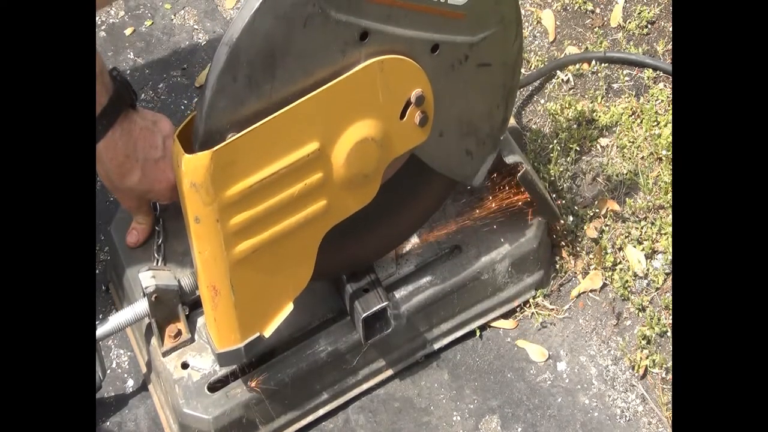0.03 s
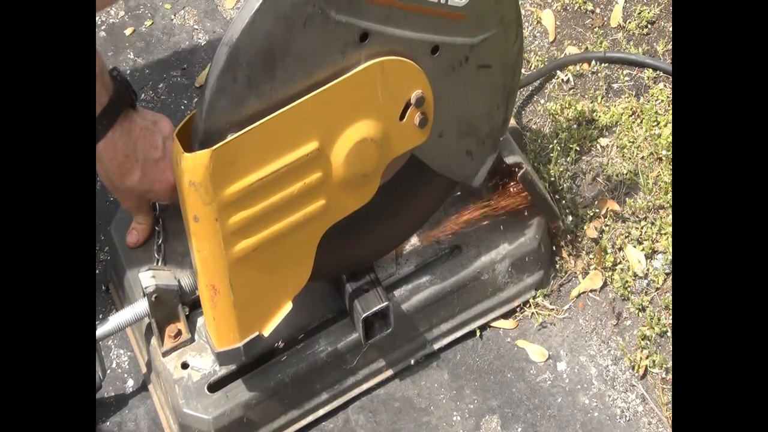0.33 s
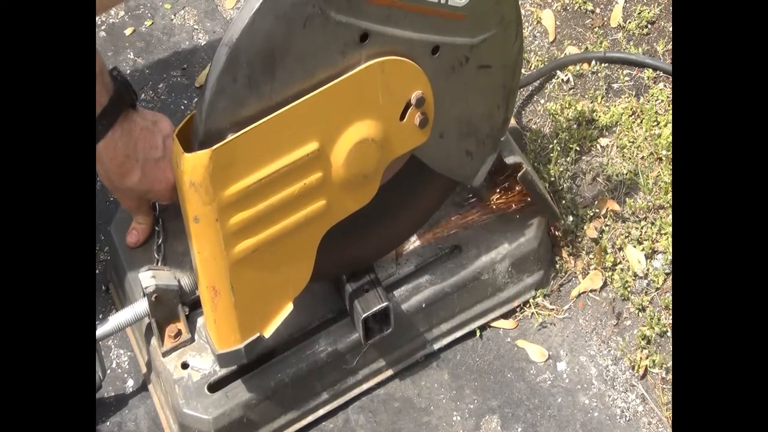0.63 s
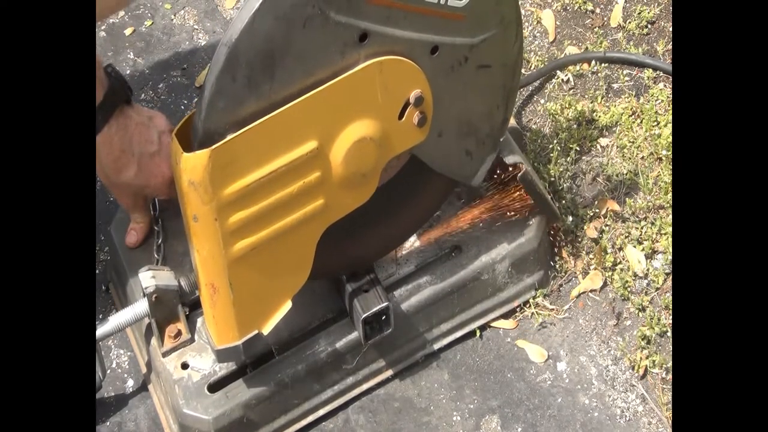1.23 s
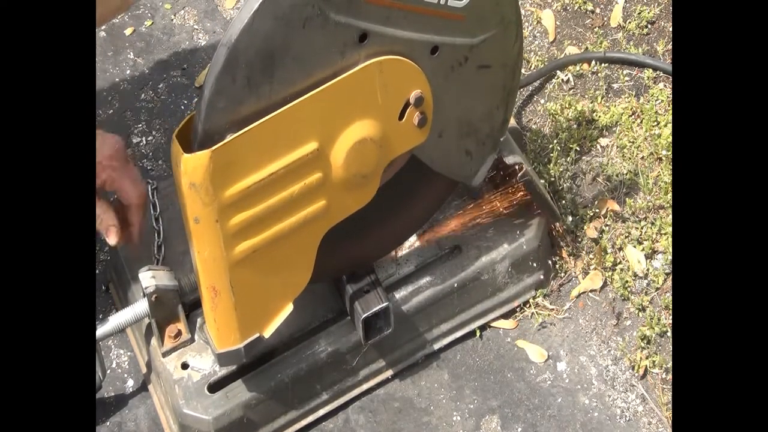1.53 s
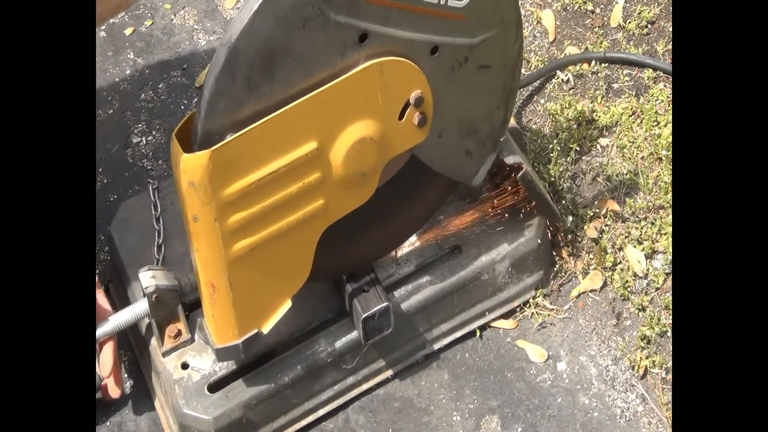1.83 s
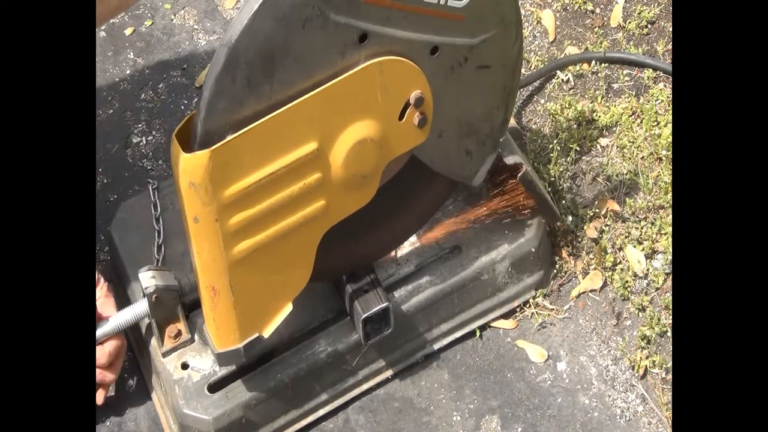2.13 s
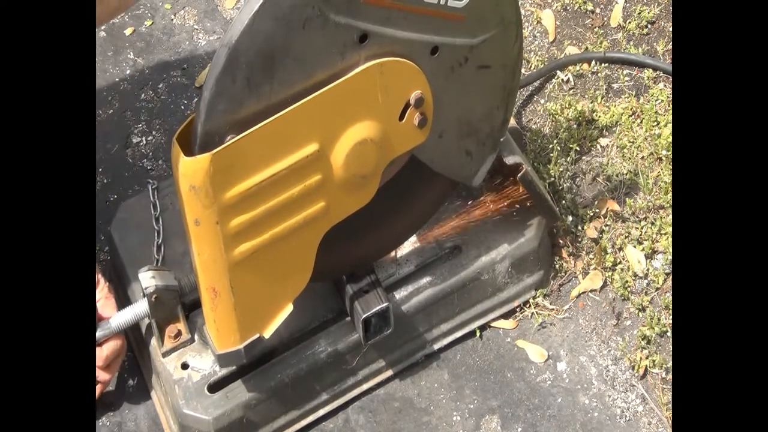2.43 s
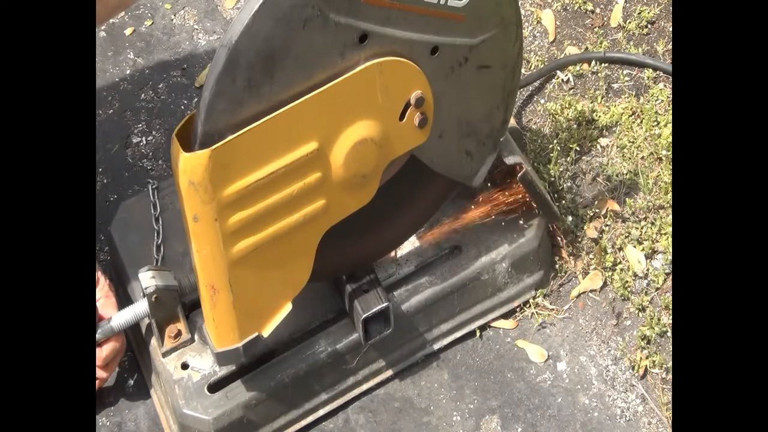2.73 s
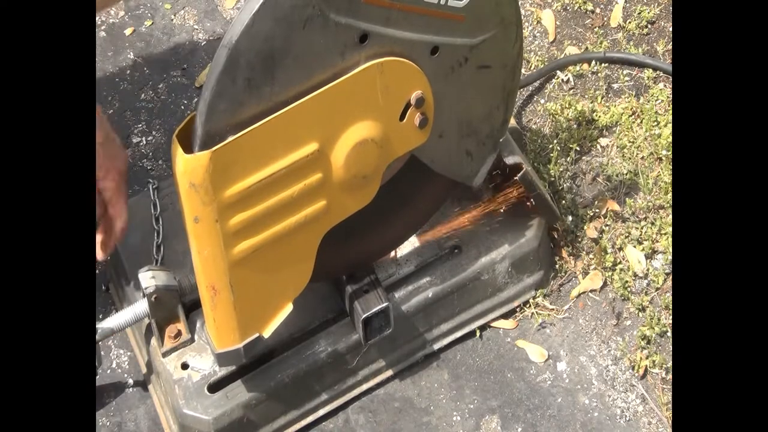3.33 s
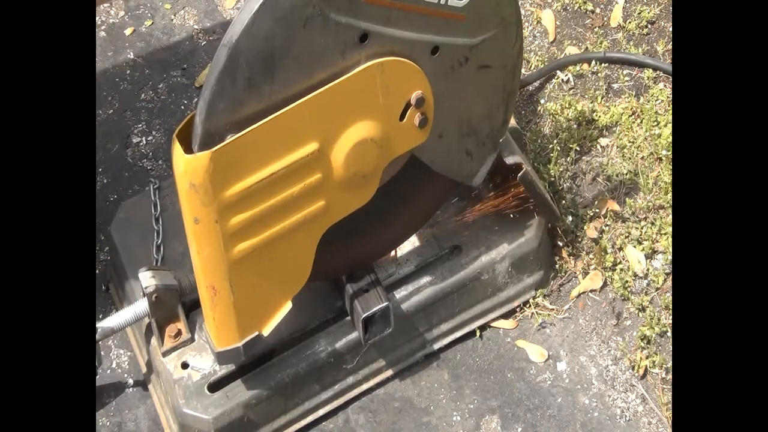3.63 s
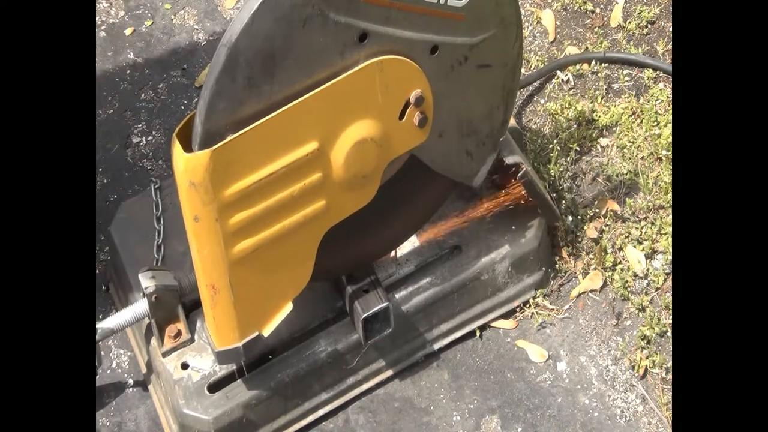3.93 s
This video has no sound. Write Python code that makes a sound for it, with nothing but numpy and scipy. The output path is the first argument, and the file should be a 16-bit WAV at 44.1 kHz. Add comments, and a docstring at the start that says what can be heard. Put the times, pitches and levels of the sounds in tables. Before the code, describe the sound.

An abrasive cutoff saw grinds through steel tubing close by outdoors, with a buzzing roar, bright hiss and thin metallic squeal. Its motor whine drops in pitch as the wheel bites, then rises near the end.

```python
"""Cutoff saw through steel tubing

An abrasive wheel grinds through a tube outdoors, slowing as it bites, then recovering. Nearly the
same grit passes the cut on every turn, so the roar and hiss buzz at the wheel's rate. The wheel's
orders slide through the fixed resonances of tube and guard, the tube's walls squeal, and the geared
motor whines on top. Moving air rumbles faintly underneath."""
import sys
import numpy as np
from scipy import signal
from scipy.fft import rfft, irfft, next_fast_len
from scipy.io import wavfile
from scipy.ndimage import map_coordinates

SR = 44100
rng = np.random.default_rng(int(sys.argv[2]) if len(sys.argv) > 2 else 0)


def store_wav(level_fs):
    """Save 16-bit WAV to argv[1]."""
    pcm = np.round(np.clip(np.atleast_2d(level_fs), -1, 1) * 32767)
    wavfile.write(sys.argv[1], SR, pcm.T.astype(np.int16))


N = 176400

# how steadily the wheel sits in the cut: t/s, steadiness/0-1
SEATING = [(0, .7), (1.1, .7), (1.5, .82), (2.7, .8), (3.4, .7), (3.58, .4), (4, .32)]


def grinding(turns, roar_lumps_db=2.0, hiss_lumps_db=1.0, pressure_db=0.47):
    """High spots on the rim press harder, pulsing the roar of the tube and the hiss of the cut."""
    # swells with feed pressure: t/s, roar level/dB, hiss level/dB
    feed = [(0, -20.3, -20), (.45, -20, -20.9), (.65, -18.6, -20.5), (.9, -19.4, -20), (1.2, -20, -19.8),
            (1.65, -22.6, -20.6), (1.9, -21.7, -20), (2.4, -21.5, -20), (2.8, -21.8, -20),
            (3.25, -21.8, -20), (3.52, -19.4, -20.4), (3.7, -20.5, -20.9), (4, -20.6, -21)]
    # tone colour of the roar: f/Hz, level/dB
    roar_colour = [(60, -56), (140, -20), (205, -16), (260, -3.5), (310, -7), (365, 1), (430, -3), (600, 0),
                   (670, -4.5), (780, 3.5), (900, -2.5), (1150, -4), (1420, 0.5), (1620, -4.5), (2000, -4),
                   (2500, -10), (4000, -16), (8000, -57)]
    # tone colour of the hiss: f/Hz, level/dB
    hiss_colour = [(1500, -45), (2900, -13), (3550, -6), (4120, -6), (4240, -1.5), (4450, -4), (4750, -2.5),
                   (4950, -8), (5300, -7), (5600, -1.5), (5900, -3), (6200, -1), (6500, -3), (6850, 0),
                   (7300, 1.8), (7650, .5), (7900, -3), (8450, -2), (8930, 1.5), (9100, -2), (9800, -2),
                   (11100, -2), (12000, -5.5), (13000, -10), (13800, -15), (14800, -11), (15800, -22)]
    roar_db, hiss_db = np.array(curves(feed)) + pressure_db * wobble(16)
    roar_grit = scrape(turns, repeats=0.38) * amp(roar_lumps_db * rim(turns, points=12))
    hiss_grit = scrape(turns, repeats=0.77) * amp(hiss_lumps_db * rim(turns, points=44))
    roar = spread(roar_grit, lambda hz: amp(along(roar_colour, hz)))
    hiss = spread(hiss_grit, lambda hz: amp(along(hiss_colour, hz)) * steel(hz))
    return amp(roar_db + 0.75) * roar + amp(hiss_db + 3) * hiss


def scrape(turns, repeats):
    """Two channels of grit on steel: the steadier the wheel sits, the more comes round every turn."""
    share = np.clip(repeats * curves(SEATING)[0], 0, 1)
    grit = np.array([rim(turns, points=1024) for _ in range(2)])
    return np.sqrt(share) * grit + np.sqrt(1 - share) * rng.standard_normal((2, N))


def rim(turns, points, life_turns=34.4):
    """The wheel's rough profile passes the cut on every turn and slowly wears into a new one."""
    survival = np.exp(-1 / life_turns)
    renewal = np.sqrt(1 - survival ** 2)
    fresh = rng.standard_normal((256, points))
    profiles, _ = signal.lfilter([renewal], [1, -survival], fresh[1:], axis=0, zi=survival * fresh[:1])
    return map_coordinates(profiles.ravel(), [turns * points], mode="wrap")


def steel(hz, width_hz=47, ring_db=1):
    """Metallic colour for the hiss: the direct sound plus the narrow rings of the steel."""
    # rings of the steel: f/Hz
    rings = [2650, 3550, 3980, 4840, 5590, 5750, 6850, 7170, 7640, 8640, 8920, 9240, 10000, 10400, 10770,
             11000, 11470, 12560]
    return 1 + resonance([(centre, width_hz, ring_db) for centre in rings], hz).real


def drone(speed, turns, waver_db=1.5, drift_rad=0.39, flutter=0.13, width_rad=0.28, scatter_db=2):
    """Each order of the uneven wheel swells as it slides through a resonance; load shifts the mix."""
    # resonances of tube, guard and base: f/Hz, width/Hz, level/dB
    frame = [(259, 25, -40), (368, 40, -35), (468, 32, -35), (519, 26, -26), (600, 34, -35), (715, 45, -37),
             (815, 36, -31), (862, 30, -34), (932, 40, -31.5), (1072, 25, -39), (1255, 45, -36),
             (1320, 55, -31), (1425, 50, -32), (1723, 40, -39), (1860, 80, -35), (1974, 30, -40),
             (4237, 45, -41), (4598, 56, -31.5)]
    # strongest orders: multiple of the wheel's rate, light-load level/dB, full-load level/dB
    orders = [(6, 6, -4), (7, 6, 11.5), (8, -1.5, 2), (9, 4, 3.5), (10, -0.5, -8), (11, 0.5, -7),
              (12, 2.5, 1.5), (13, 3, -20), (15, 2.5, 2), (16, 1, -10), (17, 0.5, -2), (18, 1.5, -12),
              (19, -1, -0.5), (20, 3.5, -3), (21, 3, -4.5), (22, -3, -4), (25, -2, 2.5), (29, 3.5, -1.5),
              (30, 5, 2.5), (31, -13, 0.5), (33, 20, -6.5), (40, -12, 1.5), (41, 5.5, -6), (46, -5, -5.5),
              (94.3, 9, 3), (107, 0, -2)]
    full_load_hz, light_load_hz = 43, 46.5
    load = np.interp(speed, [full_load_hz, light_load_hz], [1, 0])
    hz = np.arange(6000)
    frame_gain = np.sqrt(sum(abs(resonance([mode], hz)) ** 4 / amp(mode[2]) ** 2 for mode in frame))
    shake = wobble(120)
    out = np.zeros((2, N))
    for multiple, light_db, full_db in orders:
        order = round(multiple)
        phase = 2 * np.pi * (order * turns + rng.random()) + drift_rad * wobble(15)
        phase += flutter * np.log10(order) * shake  # high orders flutter more
        order_db = light_db + load * (full_db - light_db) + waver_db * wobble(12)
        level = np.interp(order * speed, hz, frame_gain) * amp(order_db)
        apart = width_rad * wobble(3.1)
        lean = amp(scatter_db * (rng.random() - .5) * np.array([[1], [-1]]))
        out += lean * level * np.sin([phase + apart, phase - apart])
    return np.sqrt(2 * curves(SEATING)[0]) * amp(2.5) * out


def squeal(turns, pulse_db=5):
    """The cut excites two narrow rings of the tube's walls; the upper one pulses once a turn."""
    # swells of the squeal: t/s, lower ring level/dB, upper ring level/dB
    swells = [(0, -55, -29), (.9, -36, -24.5), (1.25, -32.5, -34), (1.7, -34.5, -52), (2.05, -31, -48),
              (2.6, -33, -48), (3.1, -39, -51), (3.35, -51, -33), (3.55, -35, -27.5), (4, -31.5, -30)]
    # lower wall resonance: f/Hz, width/Hz, level/dB
    low_ring = [(4620, 85, 0)]
    # upper wall resonance: f/Hz, width/Hz, level/dB
    high_ring = [(6180, 73, 0)]
    low_db, high_db = curves(swells)
    pulse = amp(pulse_db * np.sin(2 * np.pi * turns))
    low = spread(scrape(turns, repeats=0.53), lambda hz: resonance(low_ring, hz))
    high = spread(scrape(turns, repeats=0.17) * pulse, lambda hz: resonance(high_ring, hz))
    return amp(low_db) * low + amp(high_db) * high


def whine(turns, order=70, flutter_db=1.85, jitter_rad=0.15, pan_db=-3):
    """The motor, geared to the wheel, sings one slightly unsteady line."""
    # swells of the whine: t/s, level/dB
    swells = [(0, -32), (.2, -40), (.28, -27.5), (.42, -28), (.6, -27), (.85, -31), (1.03, -23.5),
              (1.3, -25), (1.47, -35.5), (1.7, -39), (2.9, -39), (3.35, -33.5), (3.5, -30.5), (3.62, -23),
              (4, -27)]
    phase = 2 * np.pi * order * turns + jitter_rad * wobble(90)
    tone = np.sin(phase) * amp(flutter_db * wobble(45))
    lean = amp(np.array([[pan_db], [-pan_db]]) / 2)
    return amp(curves(swells)[0] - 2) * unit(tone) * lean


def air(gust_db=6, puff_half_s=0.02):
    """Moving air rumbles faintly and unevenly at the microphone, with two short puffs."""
    # tone colour of the rumble: f/Hz, level/dB
    colour = [(15, -5), (40, -4), (70, -3.5), (120, -11.5), (250, -10.5), (1000, -56)]
    # slow swells of the air: t/s, level/dB
    swells = [(0, -46), (.8, -47.5), (1.15, -50.5), (1.8, -52), (2.6, -50.5), (3.2, -48), (3.5, -52.5),
              (4, -43)]
    # puffs of air: t/s, rise/dB
    puffs = [(.86, 10), (.98, 11)]
    t = np.arange(N) / SR
    puffs_db = sum(rise * np.exp(-((t - at) / puff_half_s) ** 2) for at, rise in puffs)
    level_db = curves(swells)[0] + 2 + gust_db * np.tanh(wobble(18)) + puffs_db
    return amp(level_db) * spread(rng.standard_normal((2, N)), lambda hz: amp(along(colour, hz)))


def amp(db):
    """Decibels to gain."""
    return 10 ** (np.asarray(db) / 20)


def unit(x):
    """Scaled to rms 1."""
    return x / np.sqrt(np.mean(x ** 2) + 1e-20)


def along(points, hz):
    """A curve through (f/Hz, value) points, read on a log frequency axis."""
    freqs, values = np.transpose(points)
    return np.interp(np.log(hz + 1), np.log(freqs + 1), values)


def curves(rows):
    """One envelope for each column after the time."""
    times, *columns = np.transpose(rows)
    return [np.interp(np.arange(N) / SR, times, column) for column in columns]


def wobble(rate):
    """A smooth random curve, rate knots a second."""
    knots = rng.standard_normal(1024)
    coarse = np.linspace(0, N, 2048)
    return np.interp(np.arange(N), coarse, map_coordinates(knots, [coarse * rate / SR], mode="wrap"))


def filtered(x, response):
    """x shaped by a frequency response."""
    size = next_fast_len(N + SR // 2)
    return irfft(rfft(x, size) * response(np.fft.rfftfreq(size, 1 / SR)), size)[..., :N]


def resonance(modes, hz):
    """Causal response of ringing modes (f/Hz, width/Hz, level/dB)."""
    return sum(amp(db) * 1j * hz * width / (centre ** 2 - hz ** 2 + 1j * hz * width)
               for centre, width, db in modes)


def spread(pair, response):
    """Colours two unrelated signals and blends them into a partly alike stereo pair, rms 1."""
    # likeness of left and right: f/Hz, likeness (1 or more is mono)
    likeness = [(60, 1.5), (200, 0.6), (700, 1), (1300, 0.6), (2400, 0.73), (4400, 0.5), (8000, 0.65),
                (15000, 0.27)]

    def mid_side(hz):
        angle = np.arccos(np.clip(along(likeness, hz), -1, 1)) / 2
        return response(hz) * np.array([np.cos(angle), np.sin(angle)])

    mid, side = filtered(pair, mid_side)
    return unit(np.array([mid + side, mid - side]))


def scene():
    """The saw stands close, a little to the right; all its layers follow the one turning wheel."""
    # wheel speed, sagging in the cut: t/s, turn rate/Hz
    wheel_speed = [(0, 48.31), (0.25, 47.51), (0.5, 46.85), (0.75, 46.17), (1, 45.45), (1.25, 44.46),
                   (1.5, 43.52), (1.65, 43.15), (1.85, 43.0), (2.2, 43.03), (2.5, 42.88), (2.75, 42.78),
                   (3, 42.98), (3.25, 43.35), (3.45, 43.85), (3.6, 44.62), (3.75, 45.51), (4, 46.23)]
    # stereo balance: f/Hz, left over right/dB
    pan = [(60, 5), (99, 24), (160, -9), (270, -3.5), (450, -8), (740, -5), (1220, -5), (2010, -5),
           (3330, -8.5), (5500, -4.5), (9080, -2.5), (15000, -15.5)]
    speed, = curves(wheel_speed)
    turns = np.cumsum(speed) / SR
    mix = grinding(turns) + drone(speed, turns) + squeal(turns) + whine(turns) + air()
    sides = lambda hz: amp(np.array([along(pan, hz), -along(pan, hz)]) / 2)
    return filtered(mix, lambda hz: sides(hz) / sides(hz).mean(0))


def record(dry, ceiling=0.8, knee=12, top_hz=15750):
    """Rounds off the highest peaks and cuts the very top of the treble."""
    rounded = dry / (1 + np.abs(dry / ceiling) ** knee) ** (1 / knee)
    return filtered(rounded, lambda hz: hz < top_hz)


dry = scene()
out = record(dry)
store_wav(out)
```